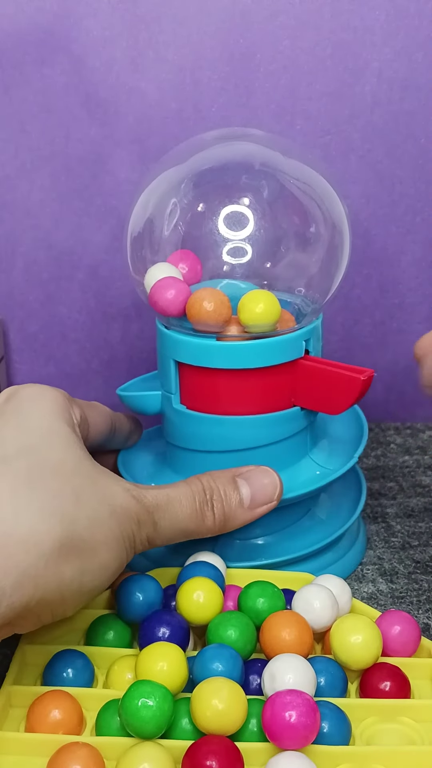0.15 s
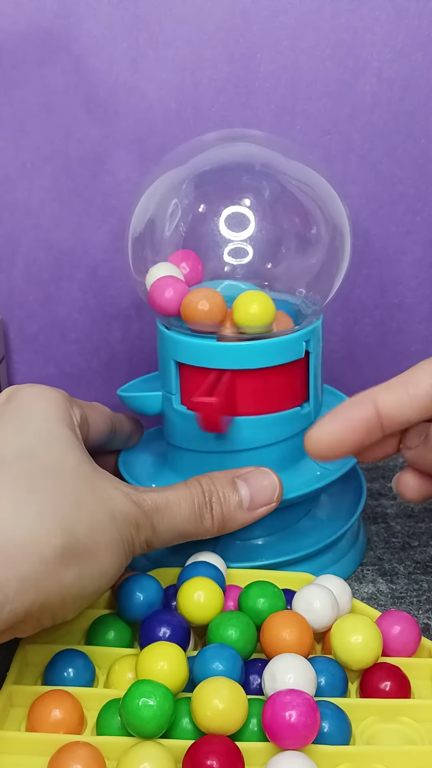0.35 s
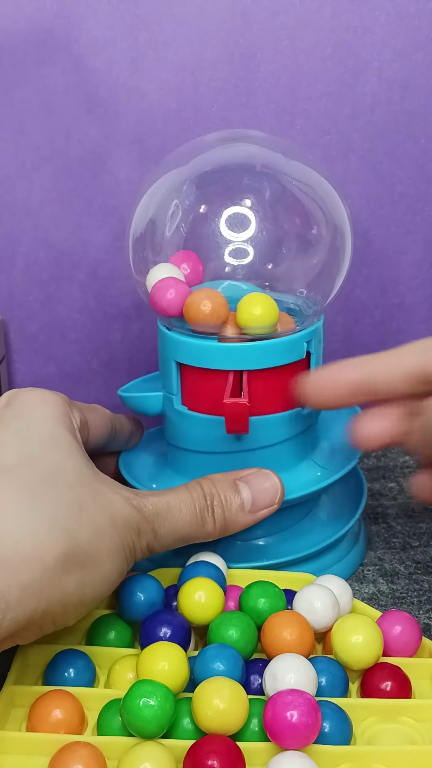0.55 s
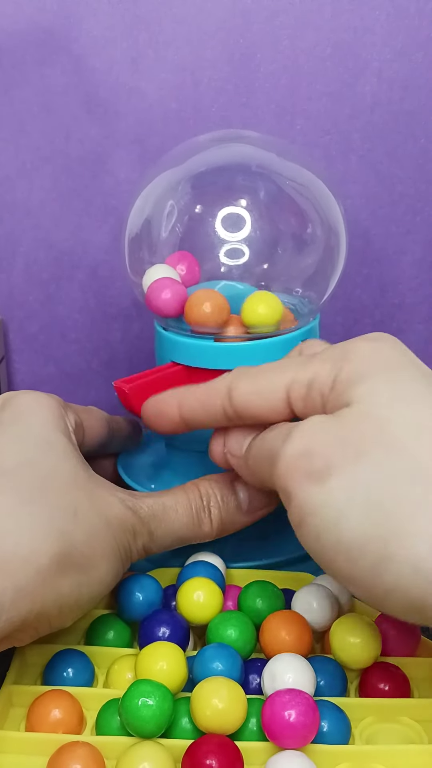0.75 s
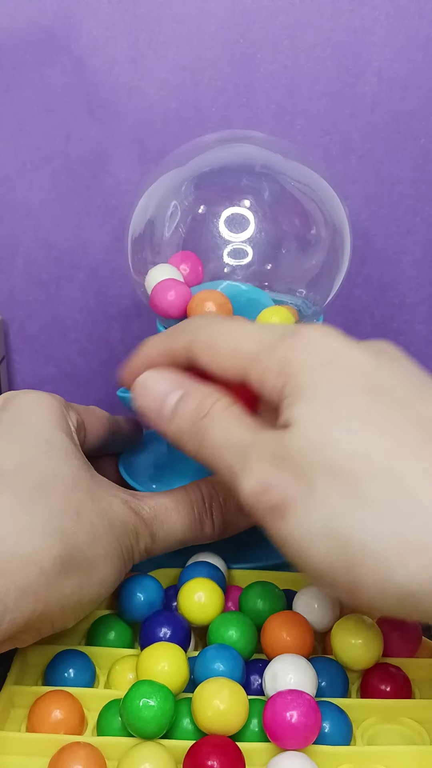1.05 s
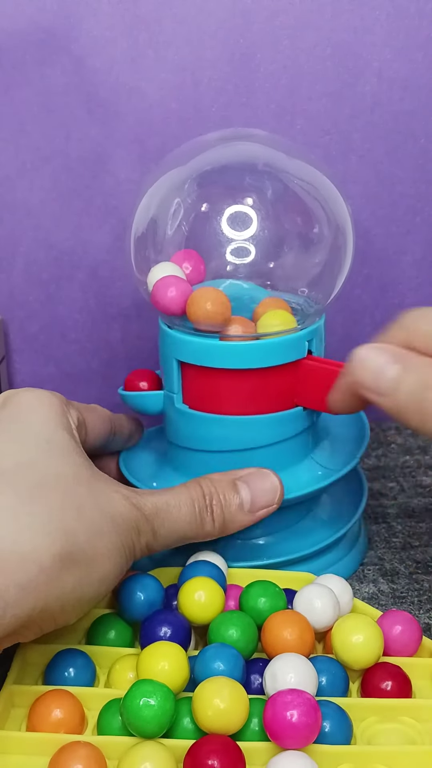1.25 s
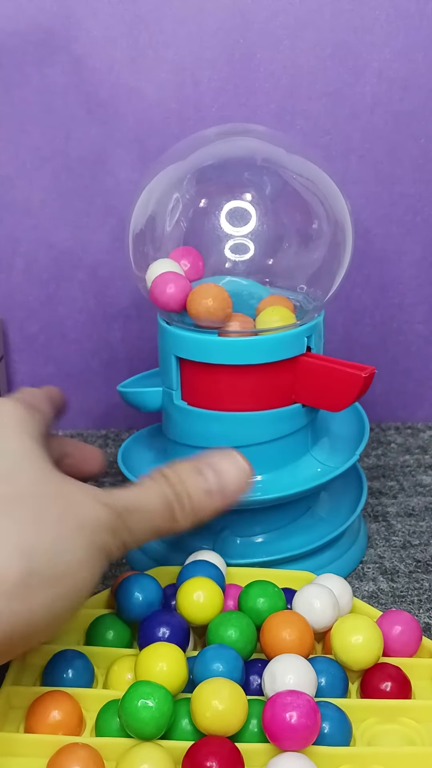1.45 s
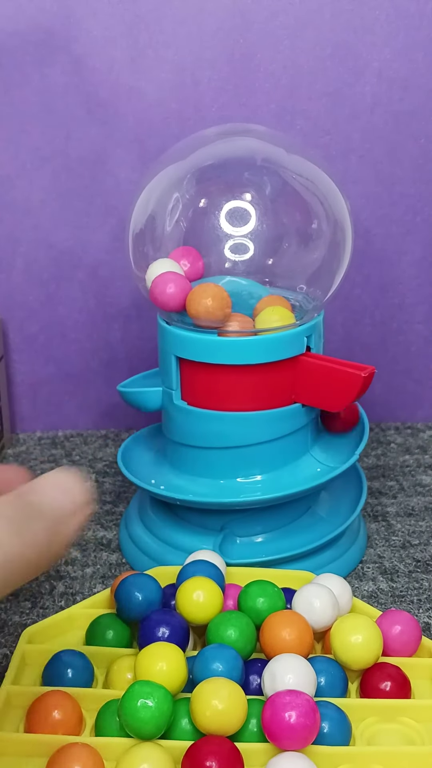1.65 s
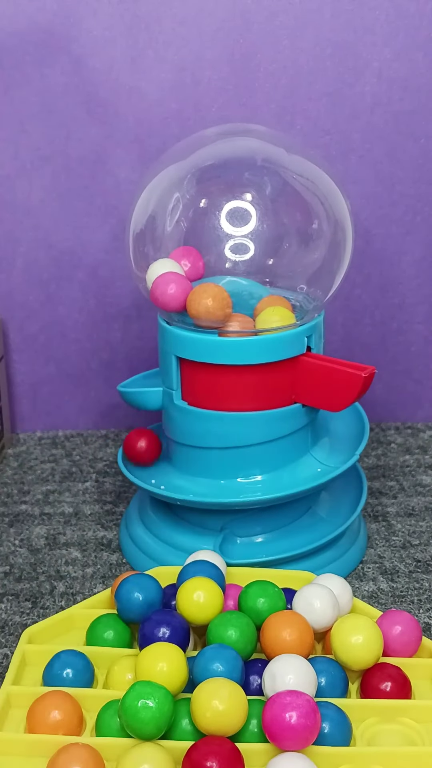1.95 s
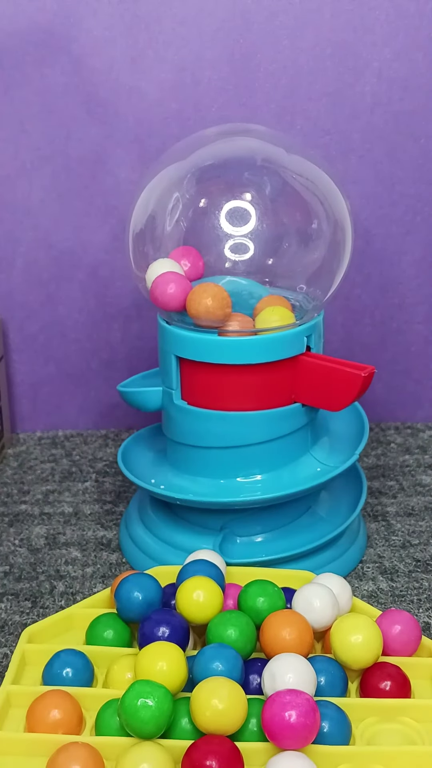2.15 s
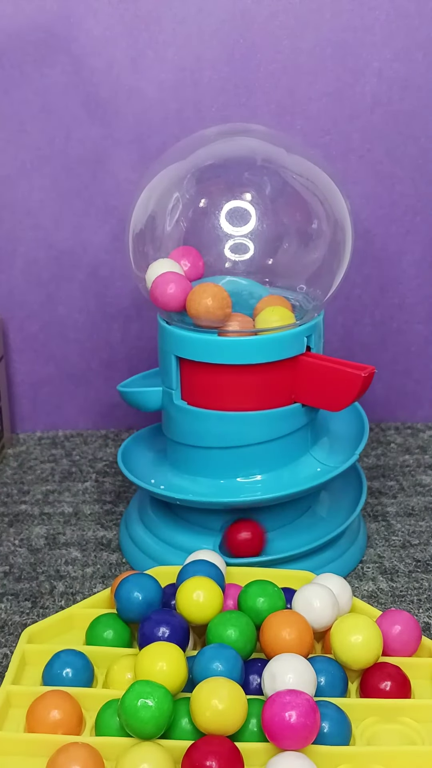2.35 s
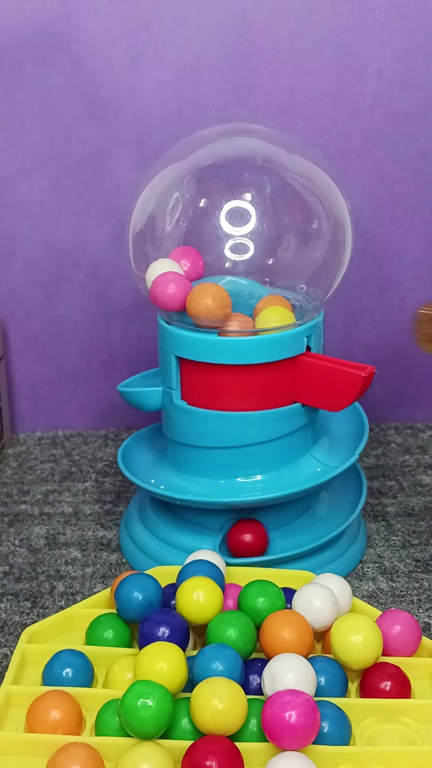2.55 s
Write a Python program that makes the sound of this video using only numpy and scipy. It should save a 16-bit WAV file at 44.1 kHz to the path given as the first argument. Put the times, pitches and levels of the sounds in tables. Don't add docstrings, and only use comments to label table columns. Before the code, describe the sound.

A hollow plastic toy lever clacks and scrapes in two quick bursts, small balls jostle lightly, then one ball rolls ticking down a spiral ramp and knocks at the bottom; small quiet room, close stereo microphone.

```python
import sys
import numpy as np
from scipy import signal
from scipy.fft import rfft, irfft
from scipy.io import wavfile
from scipy.ndimage import uniform_filter1d

SR = 44100
rng = np.random.default_rng(int(sys.argv[2]) if len(sys.argv) > 2 else 0)


def digitize_waveform(pressure):
    field = np.atleast_2d(pressure).T
    bounded = np.clip(field, -1, 1)
    quanta = np.round(bounded * 32767).astype(np.int16)
    wavfile.write(sys.argv[1], SR, quanta)


def rack_gain(trim_db):
    fader = np.asarray(trim_db, float)
    return 10 ** (fader / 20)


N = 116865
PORT_OWN = 1


def unit_rms(x):
    return x / np.sqrt(np.mean(x ** 2) + 1e-20)


def unit_peak(x):
    power = uniform_filter1d((x ** 2).mean(0), size=176)
    return x / np.sqrt(power.max())


def read(points, hz):
    table_hz, value = np.transpose(points)
    return np.interp(np.log(hz + 1), np.log(table_hz + 1), value)


def ring(x, modes, scatter=0):
    size = x.shape[-1]
    hz = np.fft.rfftfreq(size, 1 / SR)[:, None]
    mode_hz, width_hz, level_db = np.transpose(modes)
    mode_hz = mode_hz * (1 + scatter * 0.033 * rng.standard_normal(len(mode_hz)))
    level_db = level_db + scatter * 2.5 * rng.standard_normal(len(mode_hz))
    gain = rack_gain(level_db) * (-1) ** np.arange(len(mode_hz))
    damping = 1j * hz * width_hz
    response = gain * damping / (mode_hz ** 2 - hz ** 2 + damping)
    return irfft(rfft(x) * response.sum(1), size)


def add(mix, start_s, sound):
    part = mix[:, round(start_s * SR):][:, :sound.shape[1]]
    part += sound[:, :part.shape[1]]


def small_radiator(x):
    return signal.sosfilt(signal.butter(3, 220, "high", fs=SR, output="sos"), x)


def chatter(decay_s, strike_db=-40):
    strike_at_s, contact_s, rise_s = 0.0015, 0.00006, 0.00041
    t = np.arange(8192) / SR
    noise = rng.standard_normal((3, len(t)))
    strike = rack_gain(strike_db) * np.exp(-((t - strike_at_s) / contact_s) ** 2)
    envelope = np.minimum(t / rise_s, 1) * np.exp(-t / decay_s)
    return strike + (noise[0] + PORT_OWN * noise[1:]) * envelope


# frequency_hz [Hz], density_db [dB per Hz]
HISS_SPECTRUM = [(35, -4), (55, 9), (110, -6), (300, -10), (698, -14), (1960, -7), (5000, -23),
                 (16000, -15)]


def hiss():
    noise = rng.standard_normal((3, N))
    colour = rack_gain(read(HISS_SPECTRUM, np.fft.rfftfreq(N, 1 / SR)))
    return rack_gain(-67) * unit_rms(irfft(rfft(noise[0] + 0.5 * noise[1:]) * colour, N))


# frequency_hz [Hz], t60_s [s]
REVERBERATION = [(300, 0.24), (2000, 0.16), (5000, 0.15), (12000, 0.086)]


def room(x):
    taps = np.zeros((2, SR // 2))
    slots = np.arange(200, SR // 2 - 20, 20)
    at = slots + rng.integers(0, 20, (2, len(slots)))
    np.put_along_axis(taps, at, rng.choice([-1., 1.], at.shape), 1)
    hz, t, bands = signal.stft(taps, SR, nperseg=256)
    decay = rack_gain(-60 * t / read(REVERBERATION, hz)[:, None])
    tail = signal.istft(bands * decay, SR, nperseg=256)[1]
    return signal.fftconvolve(x, tail / np.linalg.norm(tail[0]), axes=1)[:, :N]


# mode_hz [Hz], width_hz [Hz], level_db [dB]
SHELL_MODES = [(850, 283, -5.5), (1660, 160, -2.5), (1873, 91, 7), (2068, 170, 5.5), (2926, 290, 3.5),
               (3460, 270, 6.5), (4160, 296, 3.5), (4730, 500, 2.5), (5170, 1700, -21), (2450, 1210, -7)]
# mode_hz [Hz], width_hz [Hz], level_db [dB]
RAMP_MODES = [(850, 120, -8), (1635, 210, 0.5), (1950, 125, -0.5), (2240, 140, 4), (2540, 450, -9.5),
              (3340, 400, 4), (3810, 520, -3), (4580, 360, -17.5), (2570, 2430, -6), (5380, 610, -14)]
# mode_hz [Hz], width_hz [Hz], level_db [dB]
CRACK_MODES = [(6170, 1170, 2.5), (7340, 590, 2), (9100, 960, 2), (11530, 3300, 4.5), (11960, 5200, 2),
               (14200, 5000, -2.5)]
# mode_hz [Hz], width_hz [Hz], level_db [dB]
GLOBE_MODES = [(437, 42.2, -1.5), (477.4, 32.7, 3), (515.6, 32.7, -0.5), (630, 63, -8.5)]
# time_s [s], level_db [dB], globe_db [dB relative to body]
FRICTION = [(0.301, -83, -2), (0.315, -33, -1), (0.417, -37.5, -2), (.5, -71, -21), (0.614, -86, -11),
            (0.632, -41.5, -3.5), (.74, -37.5, -2), (0.961, -48, -8.5), (1.02, -74.5, 0), (1.2, -45, 0),
            (1.32, -52.5, -12), (1.4, -62, 2), (1.72, -66.5, 3), (1.778, -51.5, -18), (1.97, -53, -18.5),
            (2.099, -50.5, -4.5), (2.299, -50.5, -7.5), (2.48, -73, -8)]


def rubbing():
    ticks_per_s, spread_db = 530, 4
    t = np.arange(N) / SR
    time_s, level_db, globe_db = np.transpose(FRICTION)
    tick_size = rack_gain(spread_db * np.minimum(rng.exponential(1, N), 5))
    ticks = tick_size * (rng.random(N) < ticks_per_s / SR)
    noise = rng.standard_normal((3, N))
    drive = (uniform_filter1d(ticks, size=40) * 8 + 0.5) * (noise[0] + PORT_OWN * noise[1:])
    on_ramp = np.clip((t - 1.6) / 0.073, 0, 1)
    mix = (1 - on_ramp) * unit_rms(ring(drive, SHELL_MODES))
    mix = mix + on_ramp * unit_rms(ring(drive, RAMP_MODES))
    mix = mix + rack_gain(-5 - 10.6 * on_ramp) * unit_rms(ring(drive, CRACK_MODES))
    mix = mix + rack_gain(np.interp(t, time_s, globe_db)) * unit_rms(ring(drive, GLOBE_MODES))
    return rack_gain(np.interp(t, time_s, level_db, left=-120)) * small_radiator(mix)


# mode_hz [Hz], width_hz [Hz], level_db [dB]
SPRING_TONES = [(12700, 170, 22), (12950, 54, 13), (12030, 220, 11)]
# start_s [s], level_db [dB]
SPRING_BLOWS = [(0.3094, -30), (0.3552, -15.5), (0.3787, -30), (0.6877, -22), (0.802, -20), (0.905, -23.5),
                (0.98, -40.5)]


def spring():
    out = np.zeros((2, N))
    for start_s, level_db in SPRING_BLOWS:
        add(out, start_s, rack_gain(level_db - 8.5) * unit_peak(ring(chatter(decay_s=0.018), SPRING_TONES)))
    return out


# mode_hz [Hz], width_hz [Hz], level_db [dB]
BASE_MODES = [(66.4, 49, -1.5), (160, 29, 2)]


def knocks(table, body_modes, body_db, crack_db, globe_db, strike_db, base_db, decay_s):
    out = np.zeros((2, N))
    for start_s, level_db, crack_rel_db, globe_rel_db in table:
        hardness = rack_gain(level_db + body_db + 12) ** 2
        burst = chatter(decay_s + 0.007 * hardness, strike_db)
        low = 0.3 * burst + 0.7 * burst.mean(0)
        body = rack_gain(body_db) * unit_peak(ring(burst, body_modes, scatter=0.62))
        crack = rack_gain(crack_rel_db + crack_db) * unit_peak(ring(burst, CRACK_MODES, scatter=0.95))
        globe = rack_gain(globe_rel_db + globe_db) * unit_peak(ring(low, GLOBE_MODES, scatter=0.91))
        base = rack_gain(base_db) * unit_peak(ring(low, BASE_MODES))
        sound = small_radiator(body + crack + globe) + base
        add(out, start_s - 0.0008, rack_gain(level_db) * sound)
    return out


# start_s [s], level_db [dB], #
# crack_rel_db [dB], globe_rel_db [dB]
JOSTLE_KNOCKS = [(1.1484, -37, -16, -9), (1.1583, -30, -13.5, -8), (1.1714, -41.5, -0.5, -14),
                 (1.1834, -28.5, -17, -26), (1.1987, -33, -17, -20), (1.2144, -35, -26, -5),
                 (1.2231, -25, -18, -6.5), (1.2424, -37, -6, -8), (1.2675, -30.5, -20, -18),
                 (1.2834, -42.5, -28, -1.5), (1.2945, -31, -12.5, -7), (1.3474, -44.5, -35, -10.5),
                 (1.3533, -37.5, -13.5, -18), (1.4252, -51.5, -13, -4), (1.4825, -57, -27, 1),
                 (1.517, -52, -23, -12), (1.5504, -51.5, -25, -9), (1.5708, -50, -10, -1),
                 (1.6282, -52.5, -17, -6), (1.699, -55.5, -19, -20), (1.737, -46, -22, -14),
                 (1.7569, -50, 4, -23), (1.7714, -43.5, -4.5, -20), (1.7834, -45, -5, -34),
                 (1.8008, -41.5, -14.5, -24), (1.8642, -50, -20, -15), (2.27, -39.5, -14, -28),
                 (2.4298, -39.5, -11, -19)]


def jostling():
    return knocks(JOSTLE_KNOCKS, SHELL_MODES, body_db=2, crack_db=3.5, globe_db=-0.5,
                  strike_db=11, base_db=-29, decay_s=0.0025)


# start_s [s], level_db [dB], crack_rel_db [dB], globe_rel_db [dB]
BALL_KNOCKS = [(1.8746, -42, -18, -28), (1.8874, -37.5, -15, -27), (1.8986, -35.5, -27, -29),
               (1.9124, -32, -15, -32), (1.9225, -32.5, -18, -39), (1.9334, -38, -1, -28),
               (1.952, -38.5, -12, -34), (1.9949, -35, -13, -20), (2.0054, -45, -4, -19),
               (2.0168, -34, -8, -15), (2.0284, -37, -16, -10.5), (2.0433, -30.5, -19, -18.5),
               (2.0682, -33.5, -5.5, -6), (2.0961, -31.5, -8, -9), (2.1086, -30, -12, -17),
               (2.1204, -39.5, -3, -2), (2.152, -35.5, -22, -5), (2.1725, -31.5, -14, -14.5),
               (2.1834, -48, -14, -18), (2.1954, -53, 8.5, -2), (2.2059, -24.5, -9, -21.5),
               (2.2209, -28.5, -16, -12.5), (2.2398, -31, -6, -17), (2.2538, -29.5, -8.5, -25),
               (2.2797, -29.5, -16, -27), (2.3027, -31, -35, -44), (2.3074, -36, -34, -38),
               (2.3144, -32.5, -24, -36), (2.3251, -32, -33, -46), (2.3371, -27, -29, -53),
               (2.3664, -38, -13, -18), (2.3765, -20.5, -36, -52), (2.38, -11, -23, -28),
               (2.4254, -19, -28, -37), (2.4374, -26.5, -10.5, -32), (2.4454, -24, -24, -27),
               (2.4514, -44, -26, -27.5), (2.5257, -43, -18, -29), (2.5596, -58.5, -16, -27),
               (2.5815, -60.5, -20, -31), (2.603, -32, -50, -28), (2.6184, -37.5, -34, -28),
               (2.6454, -46, -31, -28)]


def rolling_ball():
    return knocks(BALL_KNOCKS, RAMP_MODES, body_db=-8.5, crack_db=-3.5, globe_db=-3.5,
                  strike_db=14.5, base_db=-52, decay_s=0.0015)


# start_s [s], level_db [dB], crack_rel_db [dB], globe_rel_db [dB]
LEVER_KNOCKS = [(0.0625, -33, -16.5, -25), (0.1084, -21, -21, -35.5), (0.1232, -36, -2, -8),
                (0.3072, -27, -0.5, -21), (0.3471, -29, -25, -9.5), (0.3543, -16, -8, -24),
                (0.3674, -25.5, -9, -12), (0.377, -16.5, -7.5, -13), (0.4058, -28, -2, -25),
                (0.4883, -46.5, -11, -13), (0.5866, -70.5, -12, -15), (0.623, -33, -9, -29),
                (0.632, -30, -11.5, -14.5), (0.6882, -14.5, -9.5, -10.5), (0.7126, -19, -7.5, -17.5),
                (0.7557, -26.5, -19, -44), (0.7821, -28.5, -28.5, -30), (0.788, -29, -11, -35),
                (0.8025, -22.5, -9.5, -20), (0.8363, -28.5, -10.5, -10), (0.8931, -28, -27, -37),
                (0.8974, -27, -11, -25), (0.9438, -32, -5.5, -34), (0.9669, -40, -4.5, -17),
                (1.043, -41, -14.5, -24), (1.0546, -42, -24, -9), (1.0958, -46.5, -28, -8),
                (1.124, -54, -26, -28)]


def lever():
    return knocks(LEVER_KNOCKS, SHELL_MODES, body_db=2, crack_db=3, globe_db=2.5,
                  strike_db=9.5, base_db=-27.5, decay_s=0.0035)


def scene():
    toy = rubbing() + spring() + jostling() + rolling_ball() + lever()
    return toy + rack_gain(-10.5) * room(toy) + hiss()


def top_cut(x):
    return signal.sosfilt(signal.butter(12, 16630, fs=SR, output="sos"), x)


# [dB, left minus right]
PORT_BALANCE = [(60, 4.5), (240, 2), (950, -2), (3770, -5), (15000, 12.5)]


def record(dry):
    lag_s, edge_hz = -0.00014, 14630
    hz = np.fft.rfftfreq(N, 1 / SR)
    half = rack_gain(read(PORT_BALANCE, hz) / 2) * np.exp(-1j * np.pi * hz * lag_s)
    band_limit = 1 / (1 + (hz / edge_hz) ** 40)
    ports = irfft(rfft(dry) * np.array([half, 1 / half]) * band_limit, N)
    return top_cut(ports)


dry = scene()
out = record(dry)
digitize_waveform(out)
```